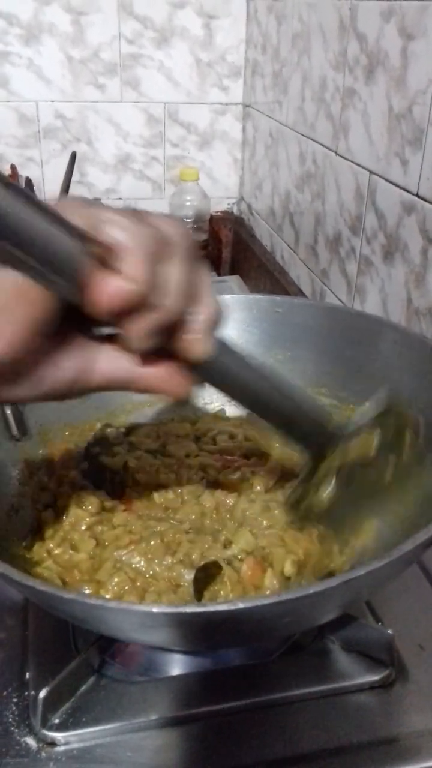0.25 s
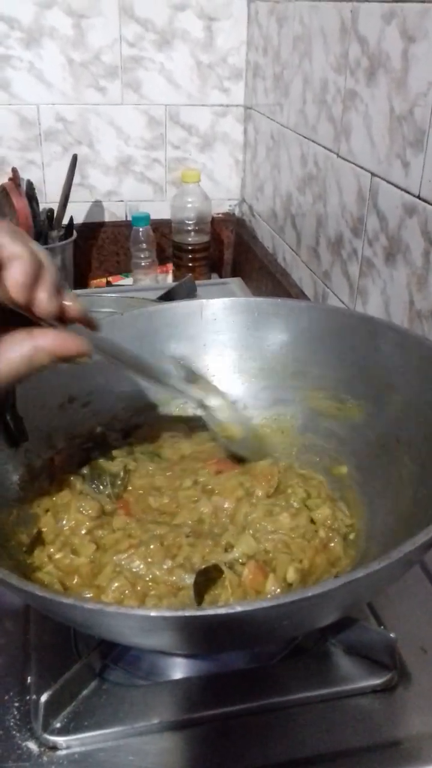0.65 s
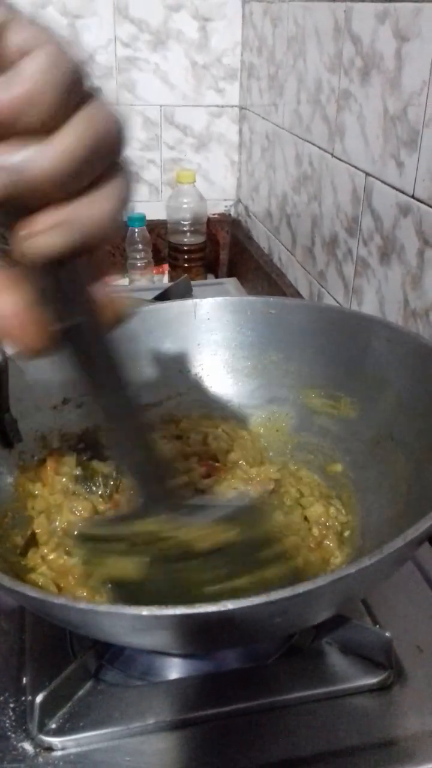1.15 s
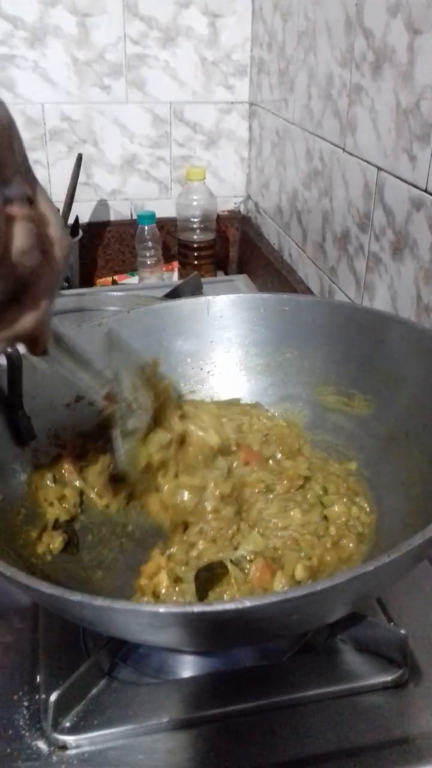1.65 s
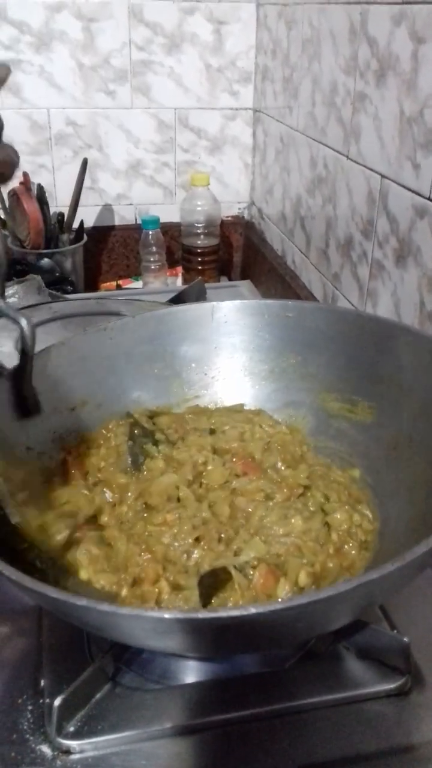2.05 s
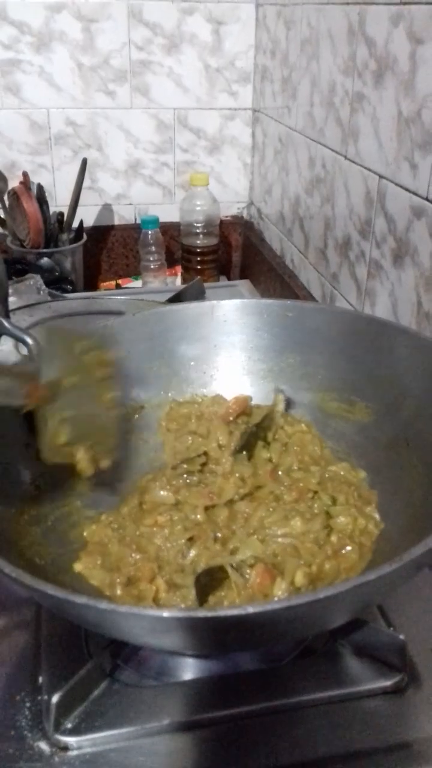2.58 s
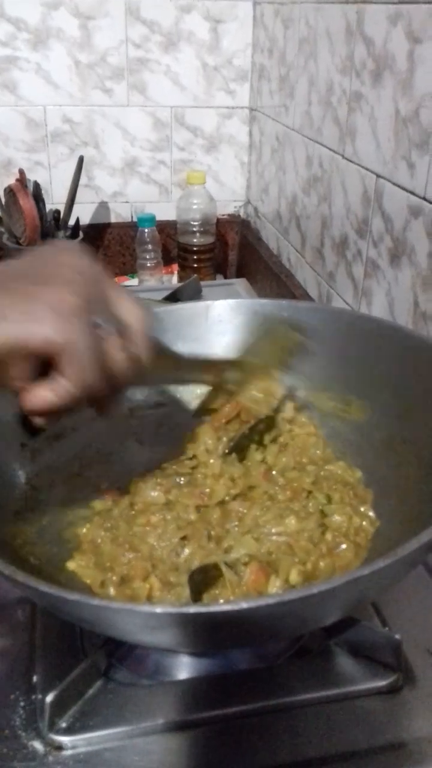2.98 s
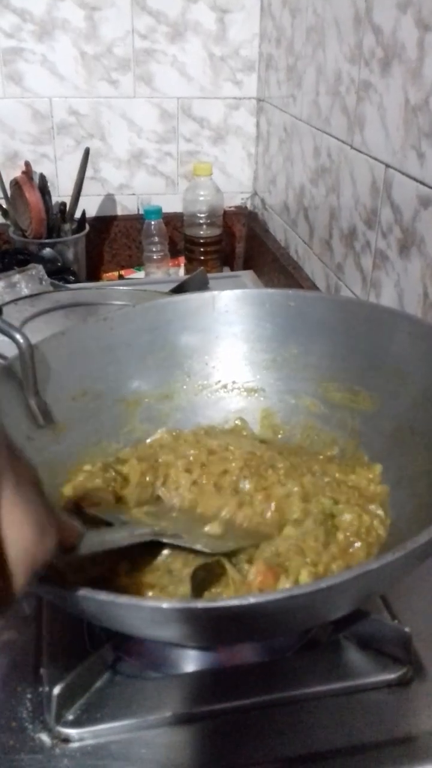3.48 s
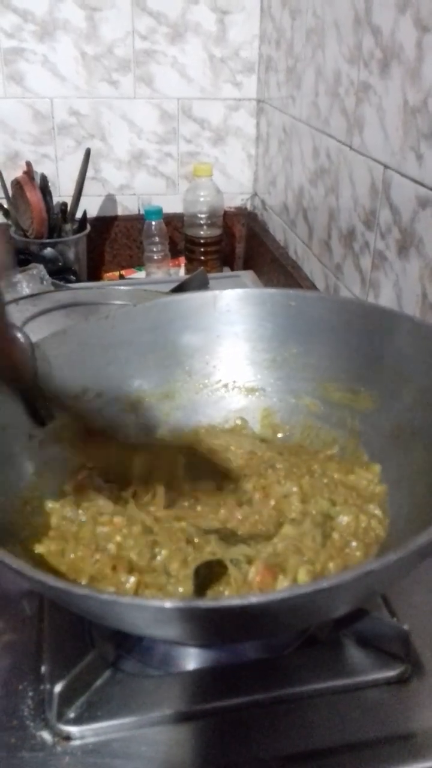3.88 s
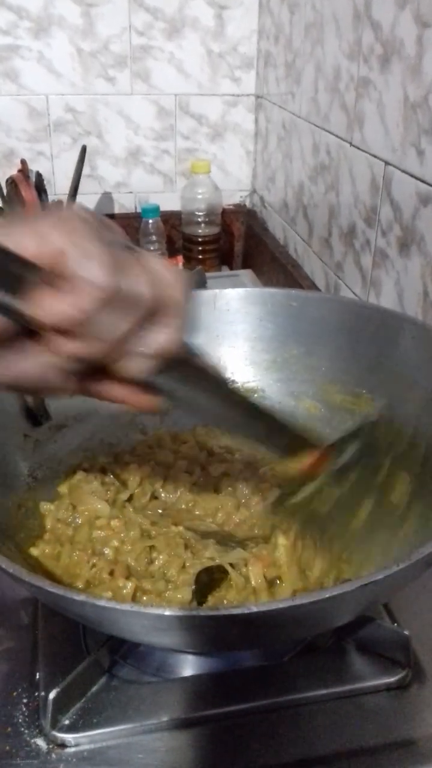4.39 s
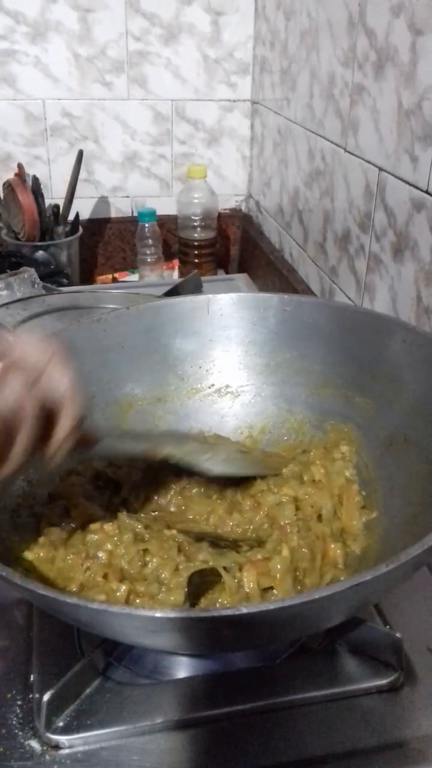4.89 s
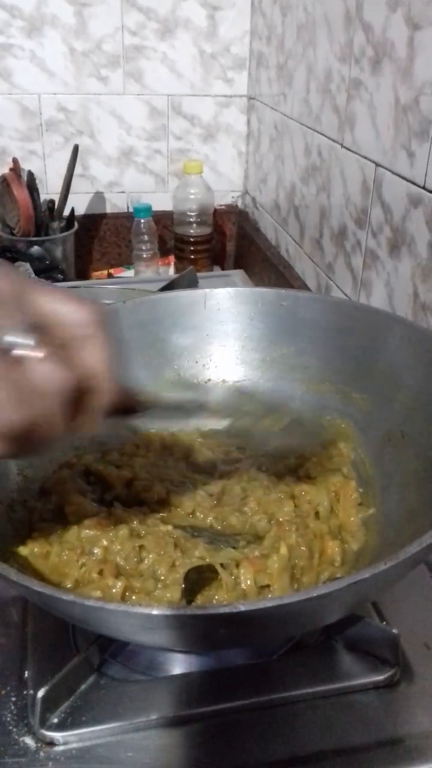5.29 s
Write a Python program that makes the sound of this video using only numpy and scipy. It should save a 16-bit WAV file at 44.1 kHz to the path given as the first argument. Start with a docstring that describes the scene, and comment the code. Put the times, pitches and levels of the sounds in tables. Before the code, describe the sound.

Close, centred sound of a flat steel spatula in a metal wok, in a small hard-tiled kitchen with about half a second of echo. A strong bright clack lands at 0.1 s with a tiny bounce, rattle and steely ring. A hissing drag starts near 0.25 s, bursting at 0.45 s into the loudest juddering scrape, with a softer knock, short rough squeals and low wok grinding until about 0.7 s. Another clack rings at 1.03 s. Faint drags follow from 1.3 s, with a barely audible touch near 1.95 s and light rubbing to 2.7 s, where a sharp, rattling clack strikes. Quiet scrapes and small squeaks come around 3 s. A bright clack at 4.2 s leads into a moderate rasp at 4.4-4.8 s, squealing near 4.55 s. Faint strokes and a dull low grind end it after 5.3 s. A very quiet, flickering simmer runs throughout.

```python
"""Spatula stirring curry in a wok

A flat steel blade clacks down in a small tiled kitchen: paired noise pulses, then a fading rattle.
It drags over the metal: click trains filtered as edge hiss and belly rasp, with juddering under pressure.
Gliding sines squeal; band-filtered low grinding marks the wok creeping; decaying sines ring the steel.
Random clicks make the soft simmer over the flame. Decaying noise makes the tile echo."""
import sys
import numpy as np
from scipy import signal
from scipy.fft import rfft, irfft
from scipy.io import wavfile
from scipy.ndimage import uniform_filter1d, minimum_filter1d

SR = 44100
rng = np.random.default_rng(int(sys.argv[2]) if len(sys.argv) > 2 else 0)


def file_out(sig):
    """Save sig as 16-bit WAV at sys.argv[1]."""
    # one column per channel
    cols = np.atleast_2d(sig).T
    # limit, then scale
    lim = np.clip(cols, -1, 1)
    pcm = np.round(lim * 32767).astype(np.int16)
    wavfile.write(sys.argv[1], SR, pcm)


N = 244269
TIME = np.arange(N) / SR

# blade landings, with the two mode regions favoured at each spot: start_s, level_db, bounce_delay_s,
# rattle_db, body_db, low_mode_hz, low_boost_db, high_mode_hz, high_boost_db
BLADE_LANDINGS = [(0.0881, -7, 0.0096, -6, 1.5, 1066, 17.5, 8600, 13),
                  (0.436, -15.5, 0.0219, -20, 8.5, 570, 17.5, 9730, 10),
                  (1.0273, -12.5, 0.0119, -9, -1.5, 2214, 15.5, 5450, 2),
                  (1.956, -37, .03, -9, 18, 800, 6, 3058, 4),
                  (2.7280, -10, 0.012, -1, 1.5, 759, 15.5, 4640, 14),
                  (4.193, -10, .013, -2, 4, 815, 4, 7440, 12.5)]
# wok and blade resonances: pitch_hz, level_db, t60_s
STEEL_MODES = [(270, -17, .4), (395, -11, .45), (571, -6, .4), (690, -10, .3), (762, -9, .4),
               (997, -2, .35), (1066, -7, .25), (1206, -8, .4), (1395, -9, .35), (1539, -9, .4),
               (1780, -10, .3), (1917, -7, .3), (2090, -8, .33), (2379, -2, .6), (3058, -7, .6),
               (3500, -11, .35), (3817, -11, .5), (4624, -6, .36), (5350, -7, .25), (5600, -4, .28),
               (5734, -4, .28), (6085, -6, .28), (6348, -7, .3), (7052, -5, .3), (7455, -2, .3),
               (7706, -3, .3), (7990, -2, .3), (8330, -2, .33), (8580, -2, .33), (8681, -4, .28)]
# spectrum of the clack: freq_hz, level_db
CLACK_SPECTRUM = [(60, -42.5), (130, -34.5), (260, -26.5), (550, -26.5), (780, -16.5), (1400, -23),
                  (2250, -18), (2900, -25), (3600, -19), (4200, -24.5), (5400, -10), (6500, -11.5),
                  (7800, 0.5), (8700, -9), (10500, -11), (12500, -25), (15500, -34)]
# spectrum of the sliding edge: freq_hz, level_db
EDGE_SPECTRUM = [(500, -51.5), (2000, -3.5), (3000, -18.5), (4000, -18), (5200, -6), (6400, -2),
                 (7600, 2.5), (8600, -0.5), (9500, -5.5), (10800, -10), (12200, -22.5), (15500, -35)]
# spectrum of the wok's belly under the blade: freq_hz, level_db
BELLY_SPECTRUM = [(60, -60), (140, -23), (260, -13.5), (480, -8.5), (640, 0), (820, -1.5), (1150, 6.5),
                  (1500, 1.5), (2000, 2), (2600, -6), (3400, -25), (5000, -46.5), (12000, -66.5)]
# drags of the blade: start_s, length_s, edge_hiss_db, belly_pressure_db
BLADE_STROKES = [(0.0, 0.038, -40.5, -44.5), (0.239, 0.28, -24.5, -36.5), (0.446, 0.12, -11, -18.5),
                 (0.602, 0.043, -33, -26.5), (1.341, 0.19, -39.5, -52.5), (1.64, .14, -50, -62),
                 (1.946, 0.3, -39, -46.5), (2.17, 0.16, -30.5, -47), (2.364, 0.049, -37, -36),
                 (2.43, 0.25, -37, -43), (2.956, 0.098, -36, -46), (3.113, 0.082, -36.5, -48),
                 (3.21, 0.14, -43, -46), (3.472, 0.048, -45, -56), (4.022, 0.15, -50.5, -63),
                 (4.383, 0.23, -18.5, -32), (4.548, 0.065, -20, -23.5), (4.673, 0.11, -27, -42.5),
                 (4.915, 0.18, -44.5, -52.5), (5.36, 0.3, -42.5, -42.5)]
# edge catching and singing: start_s, length_s, start_hz, end_hz, level_db
EDGE_SQUEALS = [(0.266, 0.15, 1531, 1560, -34.5), (0.43, 0.084, 618, 493, -31),
                (0.453, 0.027, 769.5, 789, -15), (0.521, 0.075, 1223, 1143, -24),
                (1.343, 0.06, 6890, 6700, -37), (3.017, 0.056, 693, 791, -31),
                (3.065, 0.0587, 885, 1067, -32), (4.42, 0.0476, 1366, 1430, -29.5),
                (4.554, 0.061, 666, 601, -26), (4.561, 0.056, 995, 976, -15.5),
                (4.584, 0.026, 1958, 2005, -19.5)]
# wok grinding on its support: start_s, length_s, centre_hz, level_db
WOK_SHOVES = [(0.462, 0.036, 402, -30), (0.518, 0.064, 290, -39.5), (2.337, 0.12, 250, -45.5),
              (4.233, 0.053, 390, -39), (5.397, .14, 147, -46.5), (5.405, 0.052, 570, -39)]
# spectrum of simmering curry and flame: freq_hz, level_db
SIMMER_SPECTRUM = [(25, -61), (55, -17), (95, -15.5), (125, 1), (160, -5), (260, 3), (500, -4), (700, 2.5),
                   (1100, -5), (2000, -4.5), (3500, -9.5), (5000, -8), (7700, 1.5), (10000, -4),
                   (12000, -19), (15500, -44)]
# kitchen echo decay: freq_hz, t60_s
KITCHEN_DECAY = [(150, 0.76), (1000, 0.55), (3000, 0.58), (8000, 0.5), (15000, 0.42)]

# edge hiss grows as the blade gathers speed and stops with it
EDGE_RISE_S, EDGE_RELEASE_S = 0.041, 0.016
# belly pressure bites sooner and lets go more slowly
BELLY_RISE_S, BELLY_RELEASE_S = 0.02, 0.026
# the arm eases off during a stroke
SAG_DB_PER_S = 13
# the blade keeps wading through the curry between strokes
WADE_EDGE_DB, WADE_BELLY_DB = -55.5, -62
SIMMER_DB = -50
TOP_HZ = 15900


def strikes(shapes, rattle_s=0.062, ring_db=-21.5, spot_width=0.024, spot_share=0.92, build_s=0.04):
    """The blade lands, bounces once and rattles out; each spot favours other modes. Returns clacks, ring."""
    mode_hz = np.array(STEEL_MODES)[:, 0]
    grid_hz = np.geomspace(20, SR / 2, num=400)
    clacks, rings = np.zeros(N), np.zeros(N)
    for (start_s, level_db, bounce_s, rattle_db, body_db,
         low_hz, low_db, high_hz, high_db) in BLADE_LANDINGS:
        body = [(2600, body_db), (4800, 0)]

        def spot(hz):
            """Boost around the two mode regions favoured here, in dB."""
            low = low_db * bump(hz, low_hz, spot_width)
            return low + high_db * bump(hz, high_hz, spot_width)

        # each contact swells and dies within milliseconds as the edge seats itself
        contacts_s = np.array([[start_s], [start_s + bounce_s]])
        age = np.maximum(TIME - contacts_s, 0) / .0018
        first, second = age * np.exp(1 - age)
        rattle = amp(rattle_db) * fade(start_s + bounce_s, rattle_s) * amp(2 * walk(320))
        force = contact((first + second + rattle) * rng.standard_normal(N))
        tone_db = along(CLACK_SPECTRUM, grid_hz) + along(body, grid_hz) + spot_share * spot(grid_hz)
        clacks += amp(level_db) * colour(force, np.c_[grid_hz, tone_db])

        # the rattle keeps feeding the modes, so their ring builds up
        scatter_db = 2 * rng.standard_normal(len(mode_hz))
        gains = amp(level_db + ring_db + spot(mode_hz) + along(body, mode_hz) + scatter_db)
        ring = gains @ shapes * (1 - np.exp(-TIME[:SR] / build_s))
        rings += np.pad(ring, (int(start_s * SR), N))[:N]
    return clacks, rings


def mode_shapes():
    """One second of each steel mode ringing freely as a decaying sine, one row per mode."""
    t = TIME[:SR]
    rows = []
    for pitch_hz, level_db, t60_s in STEEL_MODES:
        sine = np.sin(2 * np.pi * (pitch_hz * t + rng.random()))
        rows.append(amp(level_db) * sine * amp(-60 * t / t60_s))
    return np.array(rows)


def scrapes(shapes, hiss_db=-1.0, belly_db=-1.5, hiss_ring_db=-16, belly_ring_db=-7,
            grip_db=-28, most_slip=0.5, flutter_db=2.0):
    """The edge drags over grit and paste; harder pressure adds judder. Returns rasp, ring."""
    edge, belly = effort()
    slip = np.clip(most_slip * belly / (belly + amp(grip_db)), 0, 1)
    friction = np.sqrt(slip) * judder() + np.sqrt(1 - slip) * grit(9000, 1.8)
    force = sliding(friction) * amp(flutter_db * walk(55))
    hiss = edge * colour(force, EDGE_SPECTRUM)
    body = belly * colour(force, BELLY_SPECTRUM)
    rasp = amp(hiss_db) * hiss + amp(belly_db) * body
    # the modes store part of each stroke and sing on after it
    all_modes = shapes.sum(axis=0)
    ring = np.zeros(N)
    for x, ring_db in [(hiss, hiss_ring_db), (body, belly_ring_db)]:
        ring += amp(ring_db) * x.std() * unit(through(x, all_modes))
    return rasp, ring


def effort():
    """Drive on edge and belly: the powers of all strokes add to that of the wading blade."""
    edge_power, belly_power = amp(WADE_EDGE_DB) ** 2, amp(WADE_BELLY_DB) ** 2
    for start_s, length_s, edge_db, belly_db in BLADE_STROKES:
        edge = amp(edge_db) * stroke(start_s, length_s, EDGE_RISE_S, EDGE_RELEASE_S)
        belly = amp(belly_db) * stroke(start_s, length_s, BELLY_RISE_S, BELLY_RELEASE_S)
        edge_power = edge_power + edge ** 2
        belly_power = belly_power + belly ** 2
    return np.sqrt(edge_power), np.sqrt(belly_power)


def stroke(start_s, length_s, rise_s, release_s):
    """Envelope of one stroke: it rises, sags while held, then dies away."""
    age = np.maximum(TIME - start_s, 0)
    rise = np.minimum(age / rise_s, 1)
    sag = amp(-SAG_DB_PER_S * np.minimum(age, length_s))
    return rise * sag * np.exp(-np.maximum(age - length_s, 0) / release_s)


def judder(median_rate_hz=260, scatter=.45, size_db=2.9):
    """Stick and slip: jerks of the blade, uneven in spacing and size; rms 1."""
    chance = rng.standard_normal((4000, 2))
    gaps_s = np.exp(scatter * chance[:, 0]) / median_rate_hz
    at = (np.cumsum(gaps_s) * SR).astype(int)
    return unit(np.bincount(at, amp(size_db * chance[:, 1]), N)[:N])


def sliding(x, count=40):
    """The point of contact travels, so each colour melts into the next."""
    place = np.linspace(0, count - 1, N)
    out = np.zeros(N)
    for k in range(count):
        near = np.abs(place - k) < 1
        out[near] += contact(x[near]) * np.cos(np.pi / 2 * (place[near] - k))
    return out


def contact(x, share=.65, life_s=.002, size=400):
    """One point of contact: waves return from nearby edges within milliseconds."""
    t = TIME[:size]
    returns = rng.standard_normal(size) * np.exp(-t / life_s) * (t > 0)
    echoed = through(x, returns / np.linalg.norm(returns))
    return (x + share * echoed) / np.hypot(1, share)


def squeals(rough_db=-0.5, overtone_db=-17, overtone_below_hz=4000):
    """Short rough gliding tones where the slipping edge locks on to a resonance."""
    out = np.zeros(N)
    wobble = 1 + .025 * walk(280)
    rough = amp(rough_db * walk(130))
    for start_s, length_s, from_hz, to_hz, level_db in EDGE_SQUEALS:
        progress, size = swell(start_s, length_s)
        pitch_hz = (from_hz + (to_hz - from_hz) * progress) * wobble
        phase = 2 * np.pi * np.cumsum(pitch_hz) / SR
        overtone = (from_hz < overtone_below_hz) * amp(overtone_db) * np.sin(2 * phase)
        out += amp(level_db) * size * rough * (np.sin(phase) + overtone)
    return out


def shoves(skirt_db=-14):
    """Low grinding as the whole wok creeps on the stove: sparse grit in a band around one pitch."""
    out = np.zeros(N)
    for start_s, length_s, hz, level_db in WOK_SHOVES:
        hump = [(hz / 4, -48), (hz / 2, skirt_db), (hz, 0), (hz * 2, skirt_db), (hz * 10, -70)]
        out += amp(level_db) * swell(start_s, length_s)[1] * colour(grit(2000, 5.7), hump)
    return out


def simmer(flicker_db=2.5):
    """Countless small steam bubbles burst in the curry above the flame: filtered, flickering clicks."""
    bubbles = grit(5000, 2.1) * amp(flicker_db * walk(14))
    return amp(SIMMER_DB) * unit(colour(bubbles, SIMMER_SPECTRUM))


def kitchen(x, wet_db=-2, gap_s=0.0074):
    """Tiled walls close by: a dense noise echo, shortest in the top treble; total power is kept."""
    t = TIME[:SR]
    noise, hz = rfft(rng.standard_normal(SR)), np.arange(SR // 2 + 1)
    echo = np.zeros(SR)
    for centre_hz, t60_s in KITCHEN_DECAY:
        band = along([(f, float(f == centre_hz)) for f, _ in KITCHEN_DECAY], hz)
        echo += irfft(noise * band, SR) * amp(-60 * t / t60_s)
    # silent for gap_s, then fades in over as long again
    echo = echo * np.clip(t / gap_s - 1, 0, 1)
    wet = amp(wet_db) * through(x, echo / np.linalg.norm(echo))
    return (x + wet) / np.hypot(1, amp(wet_db))


def amp(db):
    """Decibels to gain."""
    return 10 ** (np.asarray(db) / 20)


def unit(x):
    """Scale to rms 1."""
    return x / np.sqrt(np.mean(x ** 2))


def along(points, hz):
    """Read (Hz, value) points on a log-frequency axis."""
    f, value = np.transpose(points)
    return np.interp(np.log(np.maximum(hz, 1)), np.log(f), value)


def bump(hz, centre_hz, width):
    """Bell curve of height 1 on a log-frequency axis."""
    return np.exp(-(np.log(np.maximum(hz, 1) / centre_hz) / width) ** 2)


def colour(x, points, size=2048):
    """Minimum-phase filter through (Hz, dB) points that keeps the power of white noise."""
    gain = amp(along(points, np.arange(size // 2 + 1) * SR / size))
    cepstrum = irfft(np.log(gain))
    causal = np.r_[cepstrum[0], 2 * cepstrum[1:size // 2]]
    response = irfft(np.exp(rfft(causal, size)))
    return through(x, response / np.linalg.norm(response))


def through(x, response):
    """Pass a sound through an impulse response."""
    return signal.fftconvolve(x, response)[:len(x)]


def walk(rate_hz):
    """Smooth random curve of rms 1 that changes about rate_hz times a second."""
    k = max(int(SR / rate_hz), 1)
    steps = np.repeat(rng.standard_normal(N)[:N // k + 1], k)
    return unit(uniform_filter1d(steps, k)[:N])


def grit(rate_hz, spread_db):
    """Tiny clicks of either sign at random moments, a few much larger than the rest; rms 1."""
    size = amp(spread_db * np.minimum(rng.exponential(size=N), 4))
    return unit((rng.random(N) < rate_hz / SR) * size * rng.choice([-1, 1], N))


def fade(start_s, decay_s):
    """Exponential decay from a given moment on."""
    age = TIME - start_s
    return (age >= 0) * np.exp(-np.maximum(age, 0) / decay_s)


def swell(start_s, length_s):
    """Progress 0-1 through a short gesture, and its rounded rise and fall."""
    progress = np.clip((TIME - start_s) / length_s, 0, 1)
    return progress, 2 * np.sqrt(progress * (1 - progress))


def limiter(x, ceiling=.93, hold_s=.004):
    """Turn both channels down for a few milliseconds around any peak above the ceiling."""
    size = int(hold_s * SR)
    allowed = ceiling / np.maximum(np.abs(x).max(axis=0), ceiling)
    return x * uniform_filter1d(minimum_filter1d(allowed, 2 * size + 1), size)


def scene():
    """All sources straight ahead; the long steel ring is added after the echo."""
    shapes = mode_shapes()
    clacks, strike_ring = strikes(shapes)
    rasp, scrape_ring = scrapes(shapes)
    echoed = kitchen(clacks + rasp + squeals() + shoves() + simmer())
    sound = echoed + strike_ring + scrape_ring
    return np.array([sound, sound])


def record(dry, notch_hz=8100, left_minus_right_db=-5, notch_width=0.17):
    """Left is duller and right brighter in a narrow treble band; peaks are limited, the top is cut."""
    hz = np.arange(N // 2 + 1) * SR / N
    balance_db = left_minus_right_db * bump(hz, notch_hz, notch_width)
    ports = irfft(rfft(dry) * amp(np.array([balance_db, -balance_db]) / 2), N)
    top_cut = signal.ellip(8, .2, 70, TOP_HZ, fs=SR, output="sos")
    return signal.sosfilt(top_cut, limiter(ports))


dry = scene()
out = record(dry)
file_out(out)
```